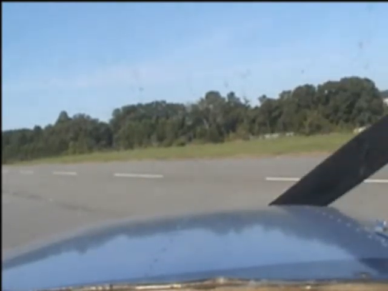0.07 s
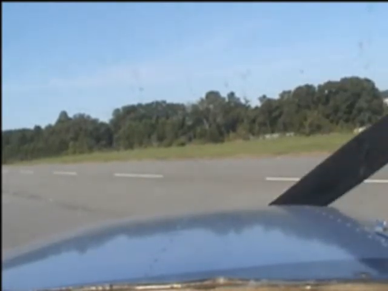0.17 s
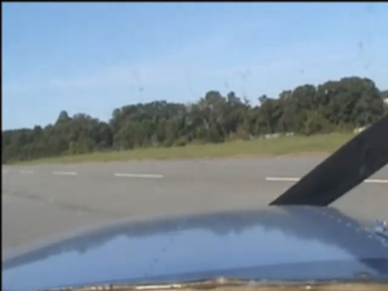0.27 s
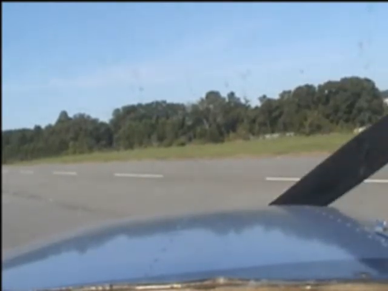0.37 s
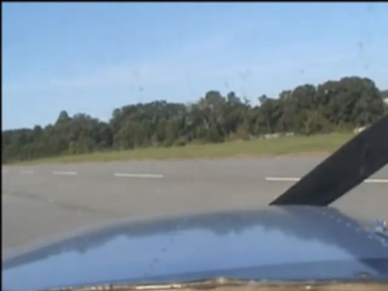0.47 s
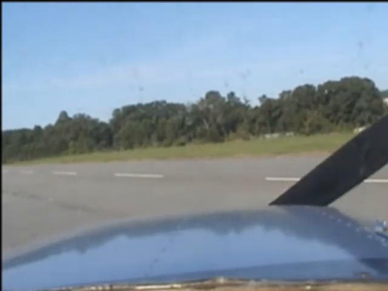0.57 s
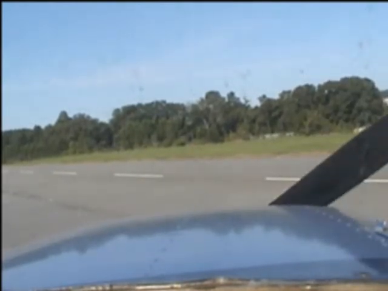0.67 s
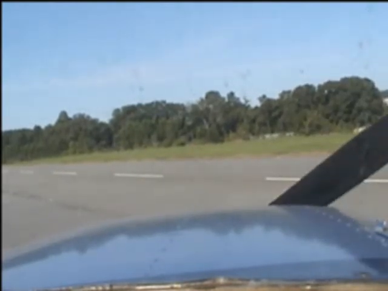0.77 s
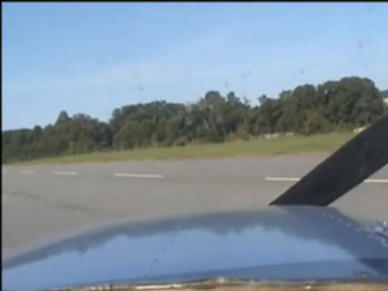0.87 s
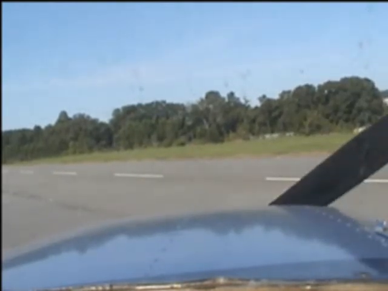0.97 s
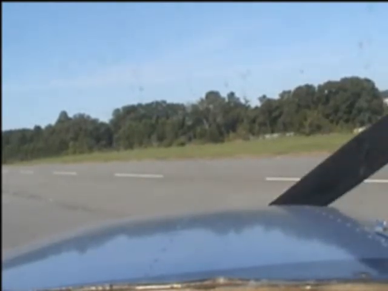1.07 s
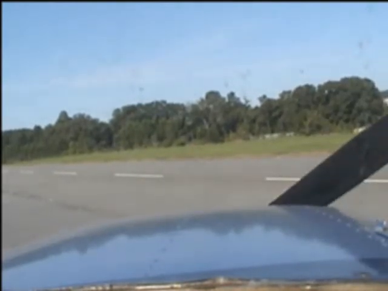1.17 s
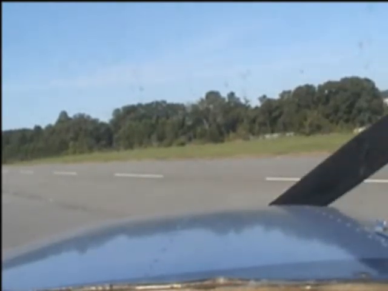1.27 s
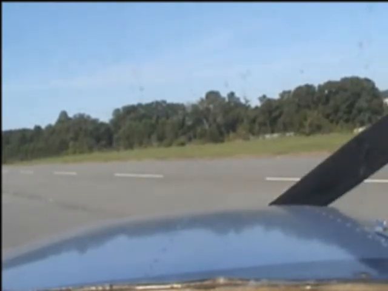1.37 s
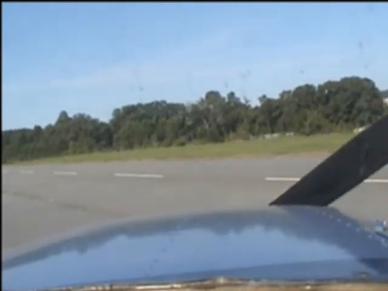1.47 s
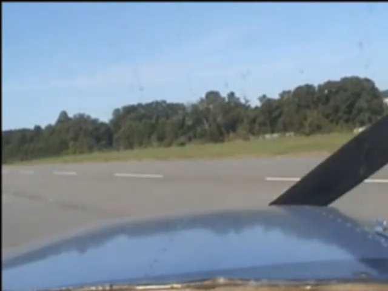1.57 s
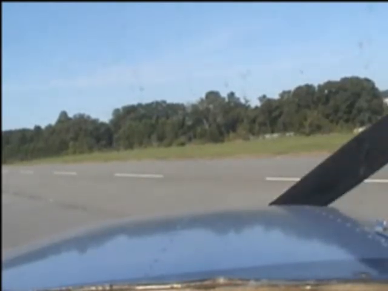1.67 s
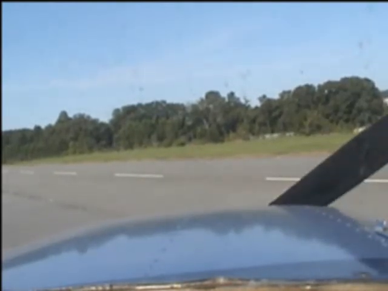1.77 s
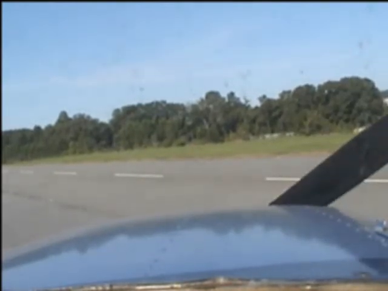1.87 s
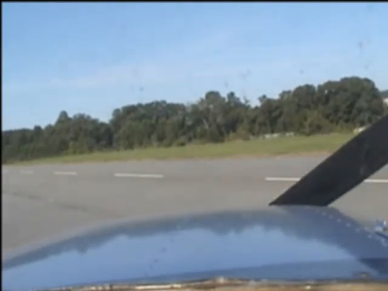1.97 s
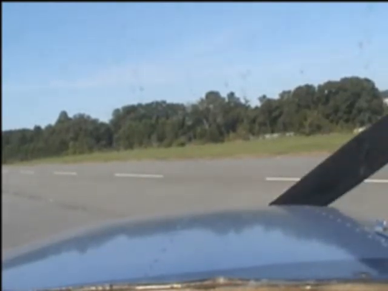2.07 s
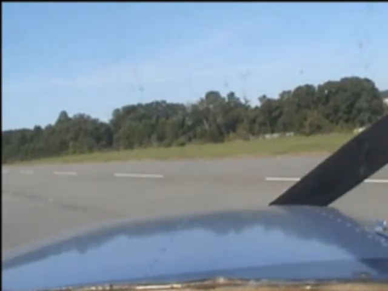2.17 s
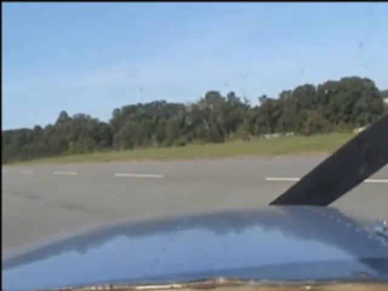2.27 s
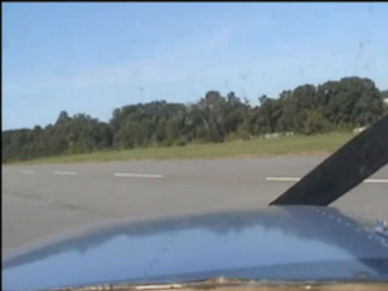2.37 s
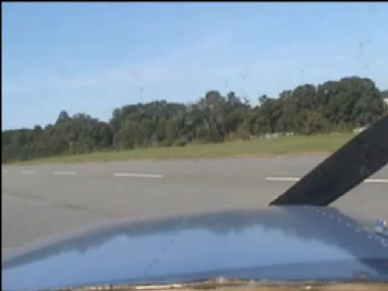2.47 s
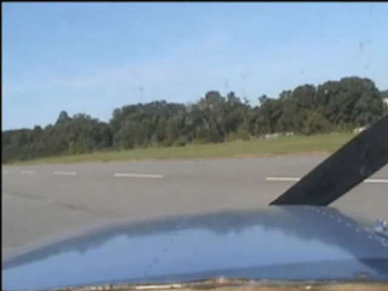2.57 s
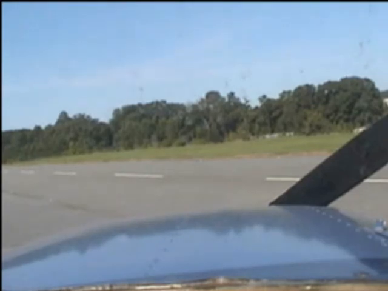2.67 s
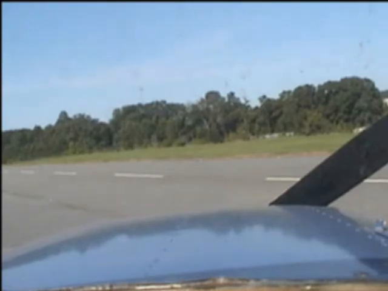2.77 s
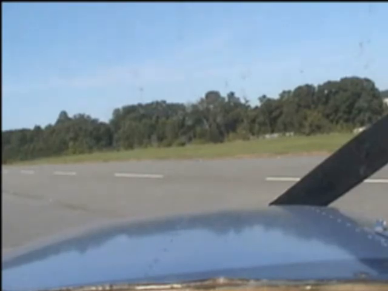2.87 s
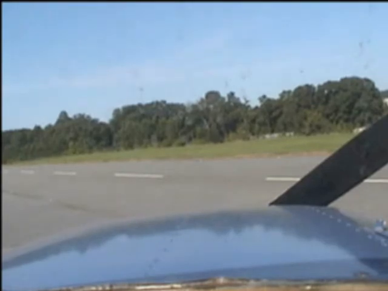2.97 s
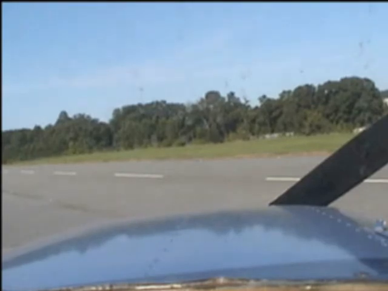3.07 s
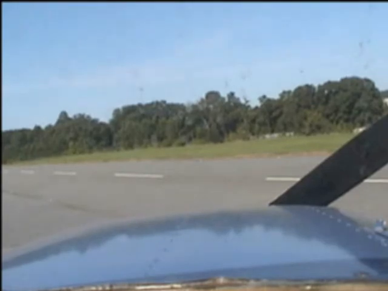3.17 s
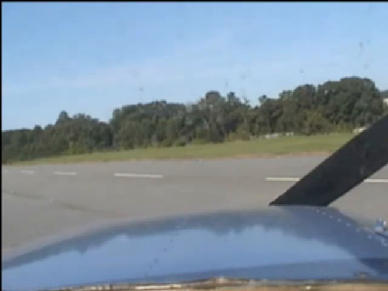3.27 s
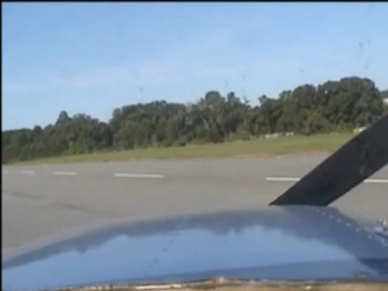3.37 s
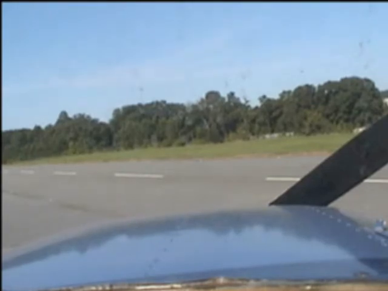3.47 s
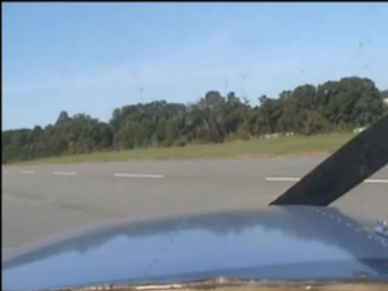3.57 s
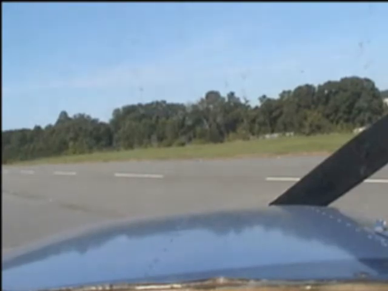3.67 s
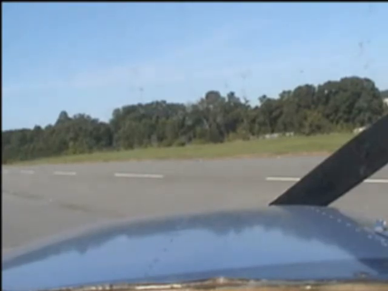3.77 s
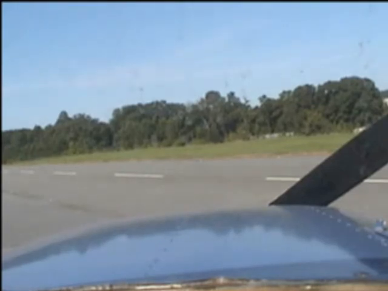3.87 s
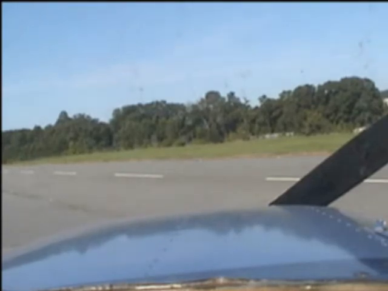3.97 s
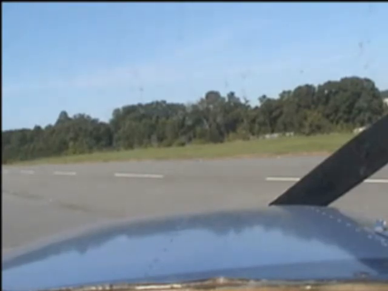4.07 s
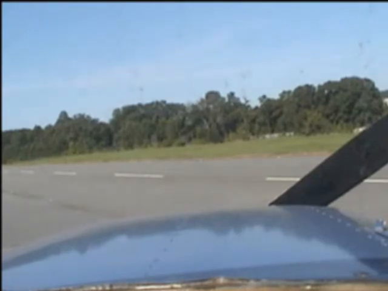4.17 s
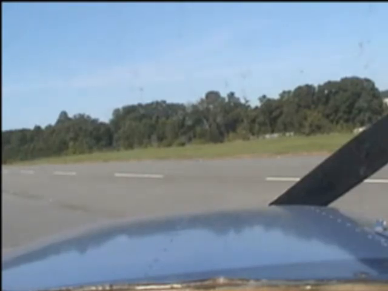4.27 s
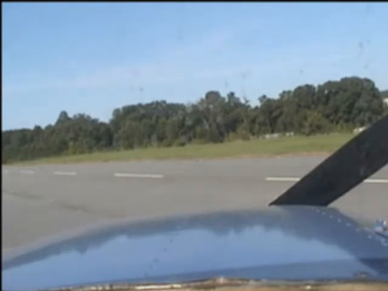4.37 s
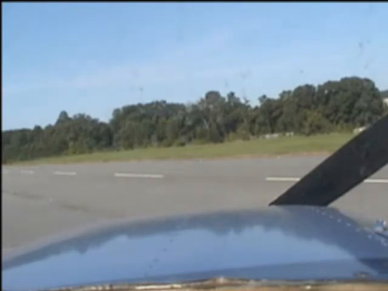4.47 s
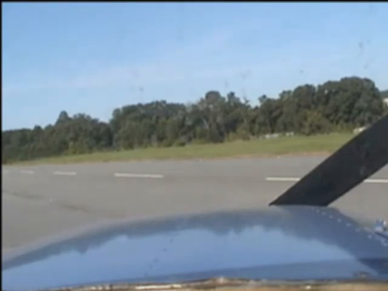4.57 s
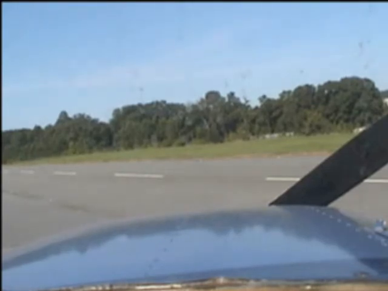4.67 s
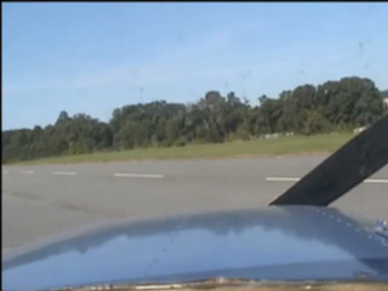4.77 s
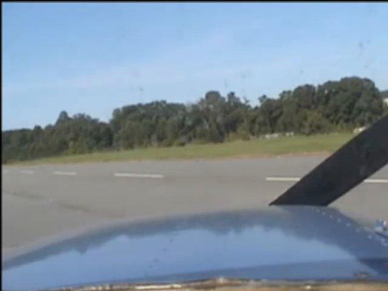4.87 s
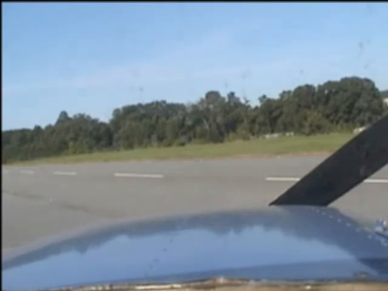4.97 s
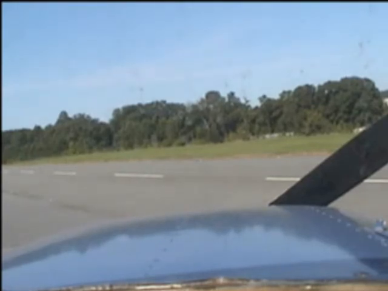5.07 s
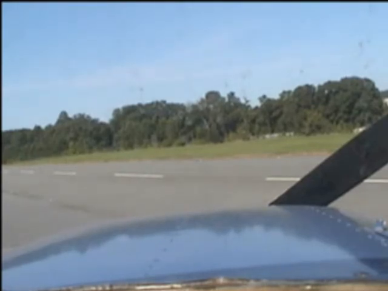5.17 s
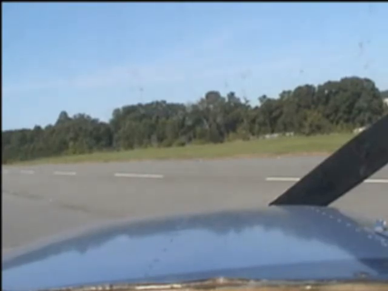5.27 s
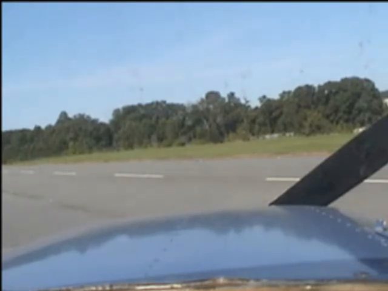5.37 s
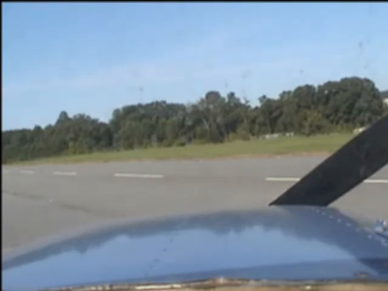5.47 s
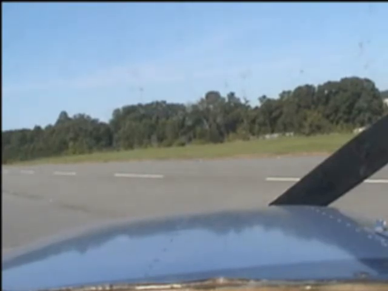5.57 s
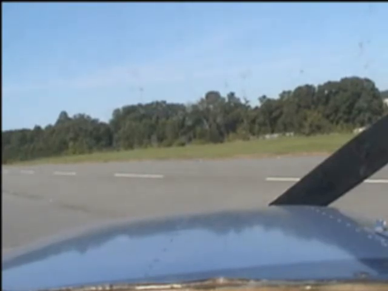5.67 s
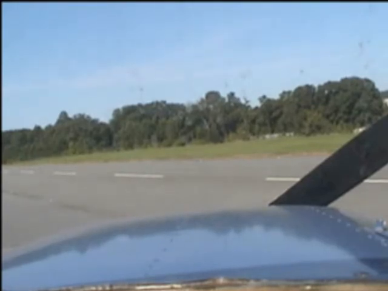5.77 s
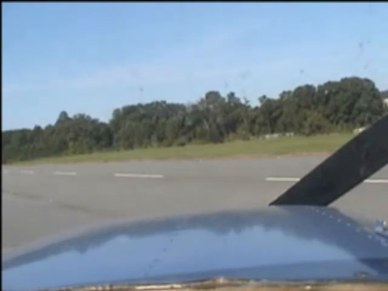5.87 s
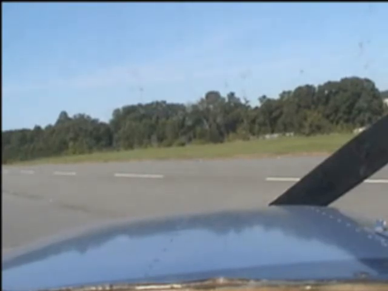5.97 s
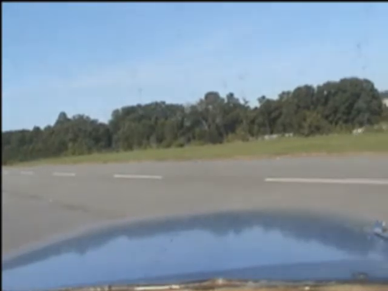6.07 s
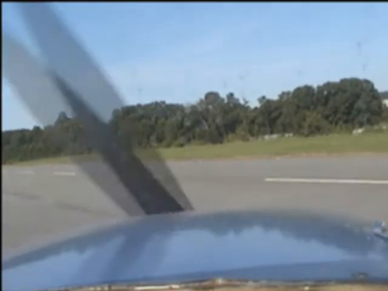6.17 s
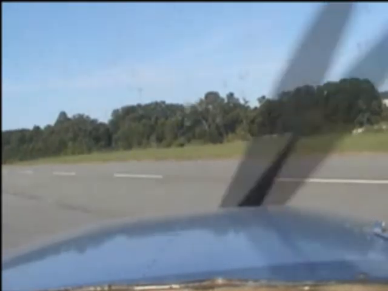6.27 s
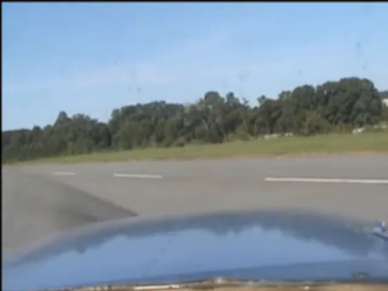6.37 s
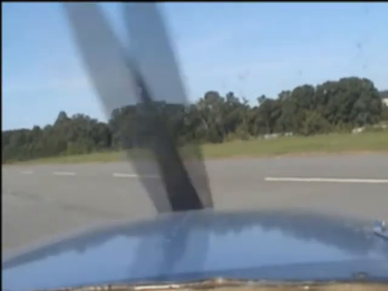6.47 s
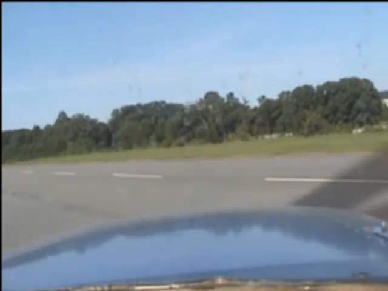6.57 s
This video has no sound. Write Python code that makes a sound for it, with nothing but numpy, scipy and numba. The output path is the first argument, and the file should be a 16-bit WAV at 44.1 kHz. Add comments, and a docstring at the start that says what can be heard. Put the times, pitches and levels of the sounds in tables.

```python
"""Light aircraft cabin, starting up

Inside a small piston aircraft, a close pair of microphones hears fan noise and the steady tones of gyros.
Nearby, panels rumble and cloth rustles as the pilot shifts, and hands scrape the panel and work switches:
filtered noise bursts and resonances. A control rod creaks as stick-slip pulses.
At the end the starter grinds the engine round: whining sines, gear-tooth pulses, clanks, boom and hiss."""
import sys
import numpy as np
from scipy import signal
from scipy.fft import rfft, irfft, next_fast_len
from scipy.io import wavfile
from scipy.ndimage import uniform_filter1d
from numba import njit

SR = 44100
rng = np.random.default_rng(int(sys.argv[2]) if len(sys.argv) > 2 else 0)


def master_out(mix):
    """Clip the mix to full scale and print it as 16-bit PCM to the path in sys.argv[1]."""
    frames = np.transpose(np.atleast_2d(mix))
    ceiling = np.clip(frames, -1, 1)
    pcm = np.round(ceiling * 32767).astype(np.int16)
    wavfile.write(sys.argv[1], SR, pcm)


N = 292383
T = np.arange(N) / SR  # time [s]

# All levels are relative to the other layers, before the microphone balance and the recorder.
# Fan noise spectrum, only its shape: (frequency [Hz], density [dB per Hz])
AIR_SPECTRUM = [(15, -16), (40, -27), (100, 6.5), (200, -5.5), (400, -18), (700, -16.5), (1200, -12.5),
                (1600, -14.5), (1900, -16.5), (3500, -22.5), (4800, -31), (7000, -30.5), (14500, -32.5),
                (16000, -46)]
# Gyro tones: (frequency [Hz], mean peak level [dB])
GYRO_TONES = [(43.1, -47), (91.5, -43.5), (834.4, -61.5), (1114, -59.5), (1206, -57), (1491, -62),
              (2331, -65), (2772, -59.5), (4290, -64), (4958, -65), (5039, -72)]
# Cabin panel resonances: (frequency [Hz], width [Hz], gain [dB])
CABIN_MODES = [(40.4, 56, -17), (96, 22.3, -1), (130.5, 22.6, 4), (193, 26.1, 5.5), (278, 80, -3),
               (354.4, 62.5, -0.5), (586, 115, -12)]
# Instrument panel resonances: (frequency [Hz], width [Hz], gain [dB])
DASH_MODES = [(828, 163, 13), (1156, 240, 9.5), (1450, 84, 15.5), (2250, 590, 0)]
# Airframe resonances: (frequency [Hz], width [Hz], gain [dB])
FRAME_MODES = [(58, 12, -2), (109, 34, -9), (199, 57, -9.5), (256.7, 13, 6), (344, 90, 3.5), (560, 78, 2.5)]
# Engine and cowling resonances: (frequency [Hz], width [Hz], gain [dB])
COWL_MODES = [(677, 43, 1), (875, 57, 6.5), (1003, 19, 1), (1293, 51, 1), (1387, 31, 6), (1534, 28, 0.5),
              (2045, 180, -12), (2326, 18, 0.5), (2710, 140, -12), (3400, 620, -19.5)]
# Bodies and hands shifting against the cabin: (time [s], rumble level [dB], cloth level [dB])
SHIFT_LEVELS = [(0, -29.5, -26), (0.06, -44, -54), (0.29, -28, -55), (0.38, -40.5, -56), (0.56, -40.5, -51),
                (0.62, -37.5, -48), (0.78, -42.5, -51), (0.85, -37.5, -50.5), (1.2, -44, -53.5),
                (1.7, -36, -51.5), (1.85, -51.5, -55.5), (2.22, -50, -55), (2.3, -37, -53),
                (2.47, -35, -54.5), (3.0, -29, -56), (3.15, -40.5, -56), (3.7, -45, -54.5),
                (4.75, -48.5, -55.5), (4.95, -33.5, -52.5), (5.3, -29, -55.5), (5.57, -47, -52.5),
                (5.65, -21.5, -52.5), (6.07, -25, -53), (6.12, -21, -50)]
# The airframe rocking on its wheels: (time [s], level [dB])
SWAY_LEVELS = [(0, -48), (2.24, -74), (2.28, -39), (2.5, -32.5), (2.8, -44), (2.95, -41), (3.3, -47.5),
               (4.7, -55), (5.4, -64), (5.75, -31), (6.12, -41)]
# Hands scraping the instrument panel, swell and fade each over 20 dB and at least 4 ms:
# (loudest time [s], level [dB], rasp against scrape [dB], swell [s], fade [s])
SCRAPE_STROKES = [(0.01, -37, -12, 0.03, 0.14), (0.11, -38, -10, 0.22, 0.04), (0.216, -48, -15, .06, .1),
                  (0.272, -22, -1, 0.013, 0.034), (0.45, -49, -15, 0.17, .1), (0.537, -30, -8, .04, 0.027),
                  (0.6, -45.5, -12, 0.027, .5), (0.77, -39.5, -11, .05, 0.27),
                  (1.074, -30.5, -9, 0.072, 0.078), (1.26, -31.5, -11, 0.028, 0.089),
                  (1.36, -42, -8, 0.023, 0.018), (1.405, -36, -15, 0.0064, 0.021),
                  (1.45, -39, -20, .03, 0.058), (1.598, -31, -16, 0.059, 0.13),
                  (1.65, -52.5, -12, 0.044, 0.9), (2.296, -40, -15, .06, 0.086),
                  (2.462, -32, -14, 0.13, 0.14), (2.658, -30, -8, 0.011, 0.011),
                  (2.694, -37, 0, .01, 0.015), (2.85, -40.5, -11, 0.16, .4), (3.0, -38, -14, 0.32, 0.039),
                  (3.196, -43, -12, 0.063, 0.075), (4.924, -33, -7.5, 0.058, 0.12),
                  (5.16, -29, -10.5, 0.028, 0.039), (5.262, -30, -5, 0.043, 0.04),
                  (5.55, -49, -18, 0.3, 0.14), (5.62, -35, -21, 0.11, 0.28), (5.68, -44, -23, 0.078, 0.17),
                  (5.92, -33, -18, 0.13, 0.059), (6.05, -25.5, -23, 0.1, 0.098)]
# Switch clicks and knocks, decay held between 8 and 200 ms: (time [s], clack level [dB], clack pitch [Hz],
# tick level [dB], thump level [dB], starting thump pitch [Hz], 60 dB decay of clack and tick [s])
KNOCK_EVENTS = [(0.03, -30.5, 1440, -39.5, -44, 207, 0.068), (0.065, -30.5, 1440, -34.5, -31, 116, 0.041),
                (0.093, -29, 1480, -40, -37, 205, 0.091), (0.116, -44, 786, -56, -25.5, 194, 0.041),
                (0.206, -33.5, 780, -52.5, -30, 340, 0.064), (0.269, -12, 620, -28.5, -22, 362, .028),
                (0.287, -28, 990, -18, -22.5, 177, 0.017), (0.481, -33, 1220, -40.5, -26.5, 185, .038),
                (0.502, -11, 1800, -22.5, -36, 124, 0.019), (0.527, -15.5, 1450, -29, -29, 128, .029),
                (0.584, -26.5, 1390, -46, -39, 121, 0.034), (0.682, -33.5, 1510, -37.5, -39, 94, 0.029),
                (0.752, -39, 1470, -48.5, -38, 382, .14), (0.787, -32, 1430, -46, -23.5, 198, 0.067),
                (0.818, -28, 805, -41, -27, 360, 0.024), (0.893, -35, 1540, -30.5, -28.5, 366, 0.033),
                (1.067, -31, 880, -31.5, -27.5, 186, 0.095), (1.089, -38, 990, -28.5, -39, 374, 0.033),
                (1.243, -24.5, 1010, -39, -31.5, 120, 0.04), (1.282, -28, 810, -50, -38, 192, 0.048),
                (1.355, -21.5, 1210, -41, -30, 182, 0.021), (1.406, -24.5, 1600, -41.5, -22, 170, 0.022),
                (1.445, -20.5, 810, -65, -27, 178, 0.033), (1.473, -2.5, 2230, -20, -42, 130, 0.013),
                (1.593, -4.5, 1120, -32.5, -26, 363, 0.017), (1.628, -30, 1700, -28, -23.5, 362, 0.029),
                (1.802, -30.5, 1950, -26.5, -35, 93, 0.021), (2.262, -29.5, 1360, -41.5, -24, 95.5, 0.027),
                (2.289, -29.5, 1370, -50, -25, 101, 0.034), (2.478, -42, 1100, -65, -20.5, 183, 0.041),
                (2.551, -45, 635, -66, -21, 196, .033), (2.657, -15, 1270, -50, -41, 108, 0.025),
                (2.691, -21.5, 1080, -39, -28, 95, 0.039), (2.721, -43, 991, -59, -19, 111, .042),
                (2.74, -27, 1360, -58, -21, 115, 0.035), (3.182, -44, 1360, -45.5, -34.5, 174, 0.058),
                (3.609, -33, 1040, -63, -32.5, 92, 0.11), (3.968, -38, 1090, -55, -49, 99, 0.059),
                (4.097, -38, 600, -65, -32.5, 91, 0.071), (4.477, -46, 1120, -73, -30.5, 186, 0.13),
                (4.789, -48, 834, -73, -31.5, 194, .045), (4.872, -48, 780, -55, -24, 116, .024),
                (4.922, -17, 580, -44.5, -17, 171, 0.043), (5.129, -40, 597, -54, -22, 105, 0.11),
                (5.16, -26, 690, -29, -9.5, 124, 0.019), (5.257, -15.5, 1150, -34, -12, 181, 0.043),
                (5.464, -35, 608, -66, -24.5, 384, .042), (5.495, -49, 786, -63, -23, 118, .041),
                (5.533, -25, 625, -69, -19, 200, 0.058), (5.58, -35, 644, -49.5, -16.5, 333, 0.054),
                (5.627, -29.5, 840, -70, -16.5, 129, 0.11), (5.713, -27, 640, -64, -13, 139, 0.085),
                (5.752, -35, 593, -60, -4.5, 112, 0.063), (5.909, -26.5, 640, -68, -9, 116, 0.14),
                (5.963, -22.5, 755, -65, -11.5, 373, 0.14), (5.999, -20.5, 670, -73, -37, 124, 0.21),
                (6.066, -10.5, 730, -61, -19.5, 387, .027), (6.111, -9, 720, -53, -10, 324, 0.028)]
# Strokes of the control rod, each a list of: (time [s], mean slip rate [Hz], level [dB], brightness [dB])
CREAK_STROKES = [
    [(2.3, 278.2, -51, 1), (2.396, 375.7, -49.5, 12), (2.41, 368.5, -27.5, -8), (2.446, 404.3, -42.5, 6.5),
     (2.502, 370, -37.5, -0.5), (2.548, 308, -37, -1.5), (2.56, 282, -34, -31)],
    [(2.78, 326.5, -43, -10), (2.842, 288, -41, 3.5), (2.918, 282.7, -28.5, -15), (2.97, 339.8, -24.5, -14),
     (3.006, 279.5, -23.5, -14.5), (3.058, 259, -31, -22), (3.094, 227, -38, -27), (3.12, 189.8, -52, -9)],
    [(5.99, 533.6, -46, -1), (6.004, 557, -37.5, -2.5), (6.09, 536, -35, 0.5), (6.1, 520, -44, 5)],
]
# Gear backlash while cranking: (time [s], burst level [dB], ring pitch [Hz])
CLANK_EVENTS = [(6.134, -12.5, 2150), (6.146, -16.5, 2120), (6.192, -15, 2010), (6.211, -18, 2330),
                (6.26, -15, 2280), (6.31, -16, 2100), (6.336, -18, 2180), (6.355, -13.5, 2580),
                (6.445, -21, 2640), (6.465, -15, 2210), (6.529, -17.5, 2220)]
# The starter: (time [s], mean tooth rate [Hz], gear tone level [dB], grind level [dB])
CRANK_COURSE = [(6.1, 424.7, -34, -77), (6.134, 440.6, -28, -14.5), (6.176, 432, -25, -30.5),
                (6.195, 447.4, -24, -13.5), (6.22, 461, -11, -15), (6.288, 470.5, -7, -30),
                (6.316, 472, -12.5, -10.5), (6.36, 479, -10.5, -16), (6.41, 504, -42, -20.5),
                (6.45, 518.8, -42, -8.5), (6.5, 539.7, -26, -9), (6.538, 580.6, -9.5, -16),
                (6.564, 440.7, -25, -17), (6.63, 447, -15, -14.5)]
# Starter hiss before its high-pass, only its shape: (frequency [Hz], density [dB per Hz])
HISS_SPECTRUM = [(590, 5), (1000, 12), (1350, 2), (1690, -6.5), (2350, -13), (2520, -16.5), (7900, -43),
                 (14800, -36.5), (16300, -41)]

AIR_DB = -46.5  # mean fan level
TREBLE_DB = -31.5  # faint top hiss against the rumble
SWAY_SPREAD_DB = 0.5
KNOCK_RISE_S, KNOCK_PAN_DB = 0.0049, 0
CRACK_DB, RATTLE_DB = 7.5, 13.5  # crack against the mean of clack and tick; rattle drive against thump
CLANK_T60_S = 0.041
LOAD_REF_DB = -15  # grind level at which shudder and hiss have the levels below
SHUDDER_DB, SHUDDER_FOLLOW = -13.5, 0.08  # level, and dB per dB of grind
HISS_DB, HISS_FOLLOW = -19, 0.36  # level, and dB per dB of grind
BOOM_DB, BOOM_PEAK_S, BOOM_SWELL_S, BOOM_FADE_S = -11, 6.18, 0.096, 0.42
TOP_HZ = 15800  # upper limit of the recorder


def undb(db):
    """Decibels to amplitude."""
    return 10 ** (np.asarray(db) / 20)


def unit(x):
    """Scale to an RMS of 1."""
    return x / np.sqrt(np.mean(x ** 2))


def noise():
    """White noise for the whole scene."""
    return rng.standard_normal(N)


@njit
def svf(x, hz, width):
    """State-variable band-pass, gain 1 at the centre."""
    y, b, l = np.empty(len(x)), 0., 0.
    g, k = np.tan(np.pi * hz / SR), width / hz
    for i in range(len(x)):
        v = (b + g * (x[i] + 1e-18 - l)) / (1 + g * (g + k))
        b, l, y[i] = 2 * v - b, l + 2 * g * v, k * v
    return y


@njit
def slips(hz, stretch, size):
    """A pulse at each wrap of the phase; every cycle has its own length and size."""
    out, phase, k = np.zeros(len(hz) + 1), 0., 0
    for i in range(len(hz)):
        step = hz[i] * stretch[k] / SR
        phase += step
        if phase >= 1:
            phase, k = phase - 1, k + 1
            # share the pulse between two samples
            out[i] += size[k] * phase / step
            out[i + 1] += size[k] * (1 - phase / step)
    return out[:-1]


def pulses(hz, jitter, scatter_db):
    """Uneven pulse train following a rate curve."""
    chance = rng.standard_normal((N // 40, 2)).T
    stretch = np.clip(1 + jitter * chance[0], .3, 3)
    return slips(hz, stretch, undb(scatter_db * chance[1]))


def body(x, modes):
    """Sum of resonances with alternating sign."""
    return sum((-1) ** k * undb(db) * svf(x, 1. * f, 1. * w) for k, (f, w, db) in enumerate(modes))


def walk(rate):
    """Random values held 1 / rate seconds, then smoothed twice over the same time."""
    k = int(SR / rate)
    held = np.repeat(rng.standard_normal(N // k + 1), k)
    return 1.7 * uniform_filter1d(uniform_filter1d(held, k), k)[:N]


def read(table):
    """Columns on the sample grid, and a gate that is open while the table runs."""
    s, *columns = np.transpose(table)
    gate = np.clip(np.minimum(T - s[0], s[-1] - T + 0.008) / 0.005, 0, 1)
    return gate, [np.interp(T, s, c) for c in columns]


def hump(s, db, swell, fade):
    """A level that climbs 20 dB in swell seconds to its top and drops 20 dB in fade seconds."""
    return undb(db - 20 * np.maximum((s - T) / max(swell, .004), (T - s) / max(fade, .004)))


def coloured(points):
    """Noise with a spectrum of (frequency [Hz], density [dB]) points."""
    f, db = np.transpose(points)
    size = next_fast_len(N)
    bins_hz = np.arange(size // 2 + 1) * SR / size
    gain = undb(np.interp(np.log(bins_hz + 1), np.log(f), db))
    return irfft(rfft(rng.standard_normal(size)) * gain, size)[:N]


def treble(x, hz):
    """Gentle first-order high-pass."""
    return signal.sosfilt(signal.butter(1, hz, "high", fs=SR, output="sos"), x)


def spread(x, pan_db, side):
    """Two close microphones: a level difference and a little unlike sound."""
    return x * undb(np.array([[pan_db], [-pan_db]]) / 2) + side * np.array([[1], [-1]])


def air():
    """Fan noise, and gyro tones that waver a little in pitch together and in level apart."""
    drift = 1 + .001 * walk(3)
    tones = 0
    for f, db in GYRO_TONES:
        level = undb(db + 2.2 * walk(9.4))
        tones = tones + level * np.sin(np.cumsum(2 * np.pi * f / SR * drift))
    mid, side = coloured(AIR_SPECTRUM), treble(coloured(AIR_SPECTRUM), 2600)
    gain = undb(AIR_DB + 0.36 * walk(2.27)) / np.std(mid)
    return spread(gain * mid + tones, 4.4, 1.38 * gain * side)


def rumbling():
    """Dense uneven bumps ring the panels, with a faint top hiss."""
    rumble = unit(body(noise() * undb(3 * walk(45)), CABIN_MODES[1:]))
    hiss = unit(svf(noise() * undb(7.5 * walk(36)), 12700.0, 6000.0))
    return rumble + undb(TREBLE_DB) * hiss


def swaying():
    """The airframe rocks on its wheels: noise through the lowest panel resonance twice."""
    low = CABIN_MODES[:1]
    level = undb(read(SWAY_LEVELS)[1][0] + SWAY_SPREAD_DB * walk(14))
    return unit(body(body(noise(), low), low)) * level


def scraping():
    """Hands scrape in uneven grains that ring the instrument panel, with a rasp above."""
    grains = noise() * undb(4 * walk(120))
    scrape = unit(body(svf(grains, 490.0, 1260.0), DASH_MODES))
    rasp = unit(svf(grains, 2770.0, 1700.0)) + 0.26 * unit(treble(grains, 6500))
    out = 0
    for s, db, bright_db, swell, fade in SCRAPE_STROKES:
        out = out + hump(s, db, swell, fade) * (scrape + undb(bright_db) * rasp)
    return out


def rustling():
    """Cloth friction: flickering noise in a broad band near 4 kHz."""
    flicker = undb(1.65 * walk(70))
    return unit(svf(svf(noise() * flicker, 4300.0, 2400.0), 4240.0, 4500.0))


def shifting():
    """The pilot moves: panels rumble, the airframe sways, cloth rustles and hands scrape."""
    gate, (rumble_db, cloth_db) = read(SHIFT_LEVELS)
    mid = undb(rumble_db) * rumbling() + swaying()
    mid = mid + undb(cloth_db) * rustling() + scraping()
    return spread(gate * mid, 1.6, 0)


def knocks():
    """Each blow: a noisy clack round its own pitch, a bright tick, and a soft push that rings a panel."""
    out, push, thud, t = np.zeros((2, N)), np.zeros(N), np.zeros(N), T[:SR // 5]
    for s, clack_db, hz, tick_db, thump_db, thump_hz, t60 in KNOCK_EVENTS:
        a, b, c = rng.standard_normal((3, len(t)))
        fall = np.exp(-np.log(1000) * t / np.clip(t60, .008, .2)) * np.minimum(t / KNOCK_RISE_S, 1)
        clack = unit(svf(svf(a, hz * 1., .4 * hz), hz * 1., .5 * hz)) + .4 * unit(body(a, DASH_MODES))
        crack = unit(svf(svf(a, 1730.0, 1600.0), 1700.0, 2100.0))
        crack = crack * undb((clack_db + tick_db) / 2 + CRACK_DB)
        tick = []
        for n in (b + 0.29 * c, b - 1.06 * c):  # partly unlike noise at the two microphones
            broad = unit(svf(treble(n, 2800), 5100.0, 12000.0))
            tick.append(broad + 3.64 * unit(svf(n, 4750.0, 1470.0)))
        blow = undb(clack_db) * clack + crack + undb(tick_db) * np.array(tick)
        # the struck panel sags in pitch as it rings; the rest of the cabin rattles with it
        ring = np.sin(2 * np.pi * thump_hz * t * (1 - 0.95 * t))
        ring = ring * np.exp(-t / 0.014) * np.minimum(t / 0.004, 1)
        snap = np.exp(-t / 0.002) * np.sin(2 * np.pi * 450 * t)
        i = int(s * SR)
        out[:, i:i + len(t)] += spread(blow, KNOCK_PAN_DB, 0) * fall
        thud[i:i + len(t)] += undb(thump_db) * (ring + 0.87 * snap)
        push[i:i + len(t)] += undb(thump_db + RATTLE_DB) * c * np.exp(-t / 0.018)
    return out + spread(thud + body(push, CABIN_MODES), 3.7, 0)


def creak():
    """Stick-slip of the rod in its bush: a wavering tone whose overtones ring the instrument panel."""
    out = 0
    for stroke in CREAK_STROKES:
        gate, (hz, db, bright_db) = read(stroke)
        slip = pulses(hz * (1 + .03 * walk(60)), .02, 1.5)
        low = unit(svf(svf(slip, 180.0, 140.0), 160.0, 240.0))
        high = body(slip, DASH_MODES) + 0.28 * svf(slip, 450.0, 300.)
        high = high + 1.26 * svf(slip, 1830.0, 800.0) + 0.22 * svf(slip, 2200.0, 1260.0)
        hiss = unit(svf(noise(), 14600.0, 3500.0))
        out = out + gate * undb(db) * (low + undb(bright_db) * (unit(high) + undb(-26) * hiss))
    return spread(out, 0.88, 0)


def clanks():
    """Short bright bursts when the gears take up their play."""
    out, t = np.zeros(N + SR // 10), T[:SR // 10]
    fall = np.exp(-np.log(1000) * t / CLANK_T60_S) * np.minimum(t / 0.002, 1)
    for s, db, hz in CLANK_EVENTS:
        a = rng.standard_normal(len(t))
        burst = unit(svf(a, hz * 1., 0.1 * hz))
        burst = burst + 0.1 * unit(svf(a, 2200.0, 1800.0)) + 0.22 * unit(svf(a, 1300.0, 740.0))
        i = int(s * SR)
        out[i:i + len(t)] += undb(db) * burst * fall
    return out[:N]


def gear_whine(hz):
    """Tooth-rate tone with overtones, uneven in pitch and level."""
    turn = np.cumsum(2 * np.pi * hz * (1 + .008 * walk(70)) / SR)
    tone = np.sin(turn) + 0.16 * np.sin(2 * turn) + 0.098 * np.sin(3 * turn) + 0.055 * np.sin(5 * turn)
    return tone * undb(1.5 * walk(60))


def fuselage_boom():
    """The fuselage booms as the engine rocks: noise through the lowest airframe resonances."""
    level = hump(BOOM_PEAK_S, BOOM_DB, BOOM_SWELL_S, BOOM_FADE_S)
    return level * unit(body(noise(), FRAME_MODES[:3]))


def brush_hiss():
    """High-passed noise of the starter brushes."""
    return unit(treble(treble(coloured(HISS_SPECTRUM), 2800), 2700))


def starter():
    """Gear teeth whine unevenly and hammer the cowling; the airframe shudders; brushes hiss."""
    gate, (hz, whine_db, grind_db) = read(CRANK_COURSE)
    whine = gear_whine(hz)
    teeth = unit(pulses(hz, .03, 4.0)) + .8 * noise() * undb(3 * walk(60))
    grind = unit(body(teeth, COWL_MODES))
    load_db = grind_db - LOAD_REF_DB
    shudder = unit(body(noise() + .5 * teeth, FRAME_MODES[3:]))
    shudder = shudder * undb(SHUDDER_DB + SHUDDER_FOLLOW * load_db)
    flicker = undb(HISS_DB + HISS_FOLLOW * load_db + 2.1 * walk(50))
    hiss, side = brush_hiss() * flicker, brush_hiss() * flicker
    mid = undb(whine_db) * whine + undb(grind_db) * grind + shudder + fuselage_boom() + hiss + clanks()
    unlike = 0.39 * side + 0.7 * svf(side, 7200.0, 3600.0)
    unlike = unlike + undb(grind_db - 13.0) * unit(body(noise(), COWL_MODES))
    return gate * spread(mid, 1.0, unlike)


def cabin_ring(near):
    """The small cabin rings briefly after the near sounds, differently at each microphone."""
    t = T[:SR // 6]
    tail = rng.standard_normal((2, len(t))) * np.exp(-np.log(1000) * t / 0.073) * (t > .002)
    return signal.fftconvolve(treble(near, 213), tail, axes=1)[:, :N]


def scene():
    """Fan and gyros behind, the near sounds with their cabin ring, and the starter."""
    near = shifting() + knocks() + creak()
    return air() + near + undb(-27.0) * cabin_ring(near) + starter()


def record(dry):
    """The recorder rounds the loudest peaks and cuts the top."""
    rounded = np.tanh(1.05 * dry) / 1.05
    return signal.sosfilt(signal.ellip(8, .2, 60, TOP_HZ, fs=SR, output="sos"), rounded)


dry = scene()
out = record(dry)
master_out(out)
```